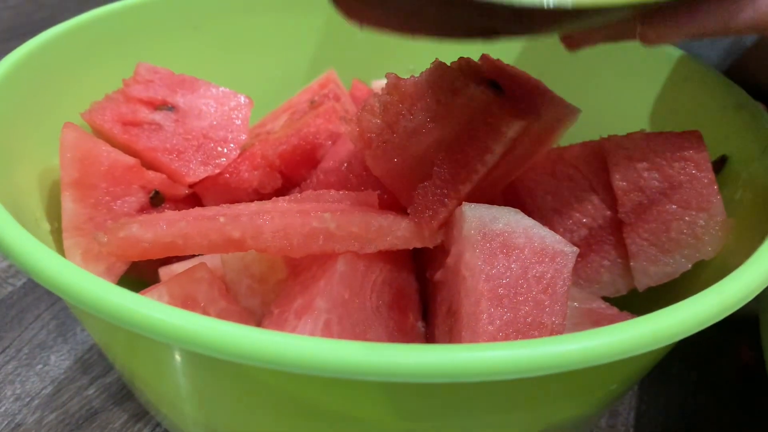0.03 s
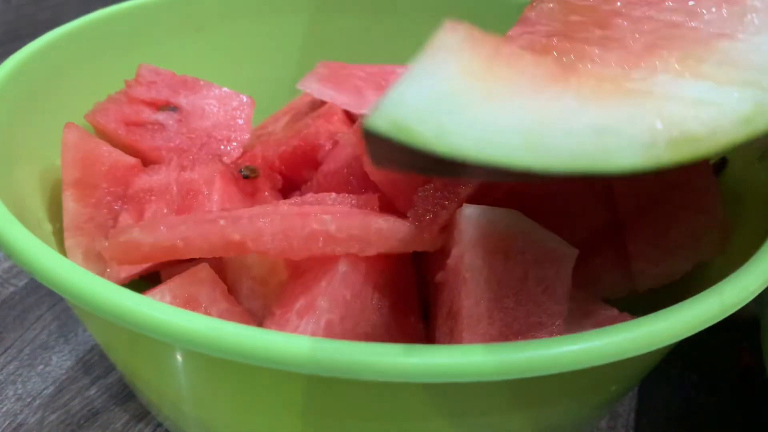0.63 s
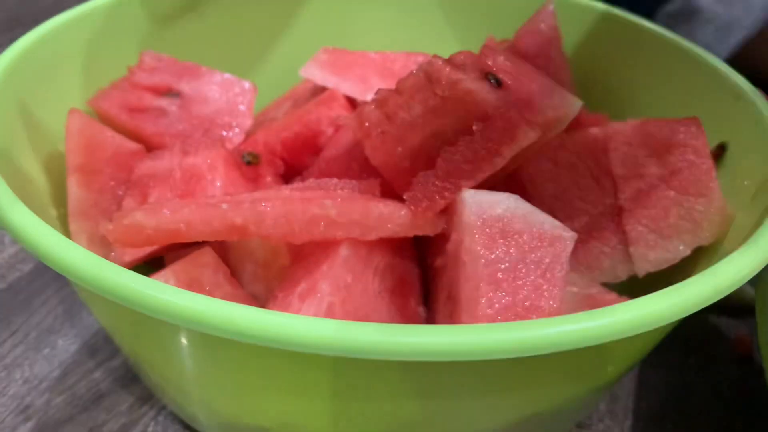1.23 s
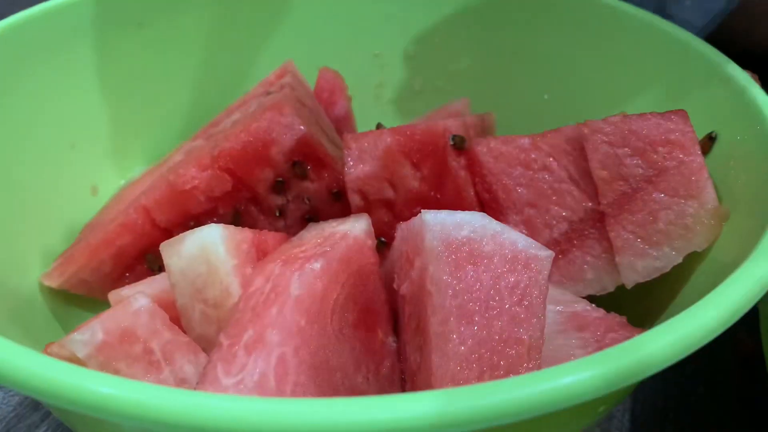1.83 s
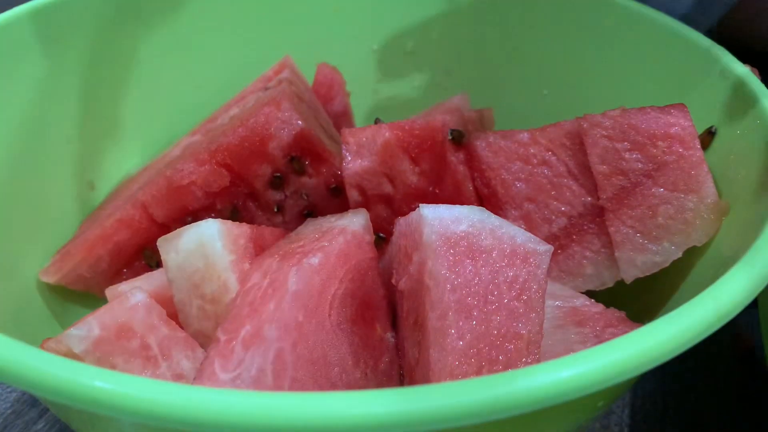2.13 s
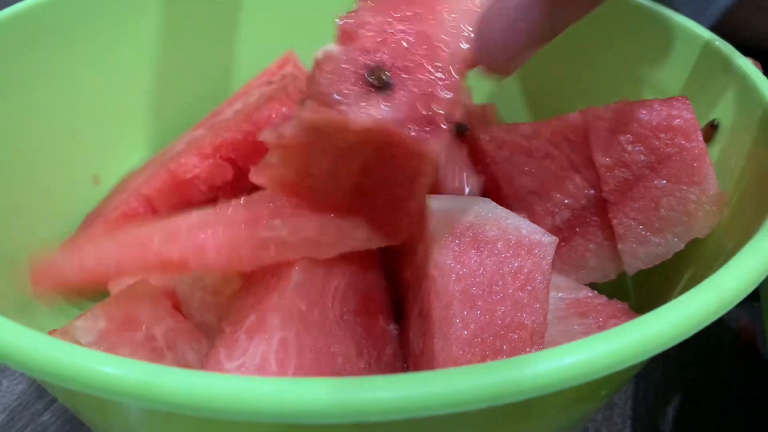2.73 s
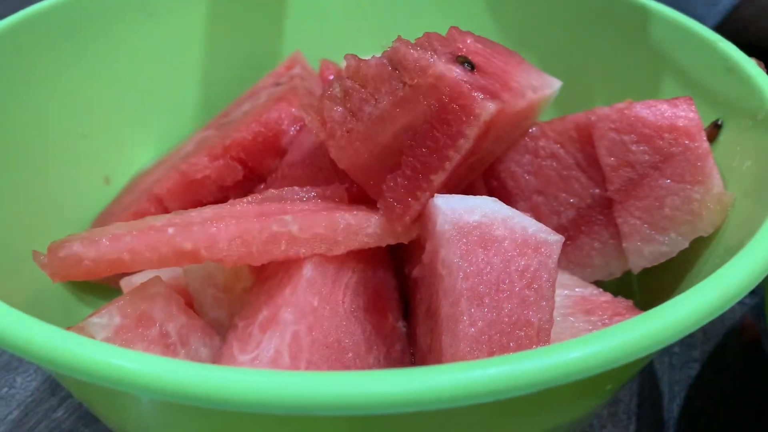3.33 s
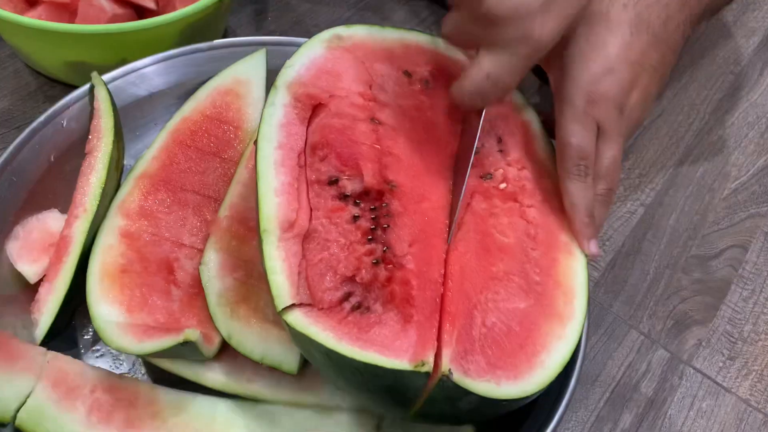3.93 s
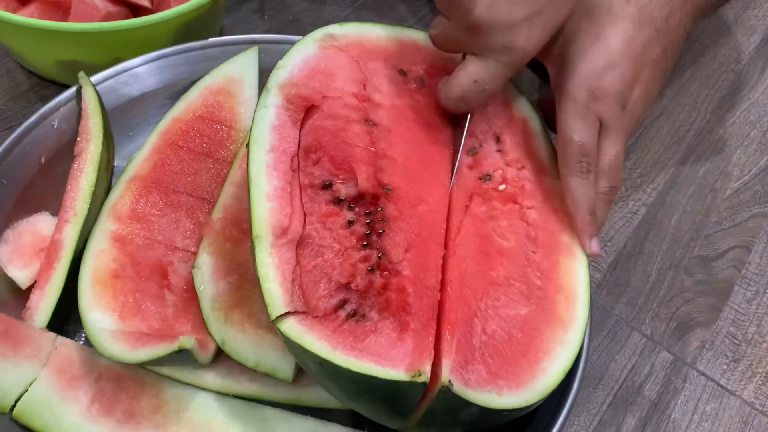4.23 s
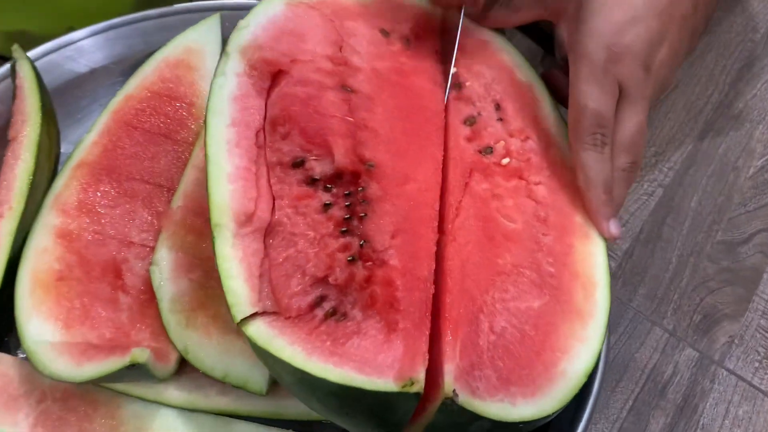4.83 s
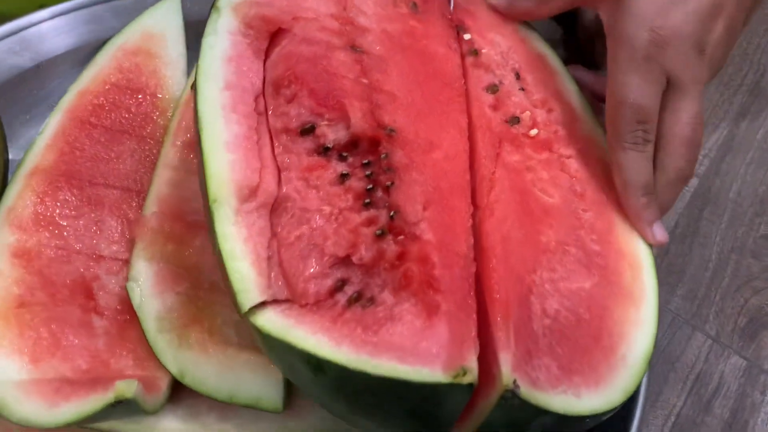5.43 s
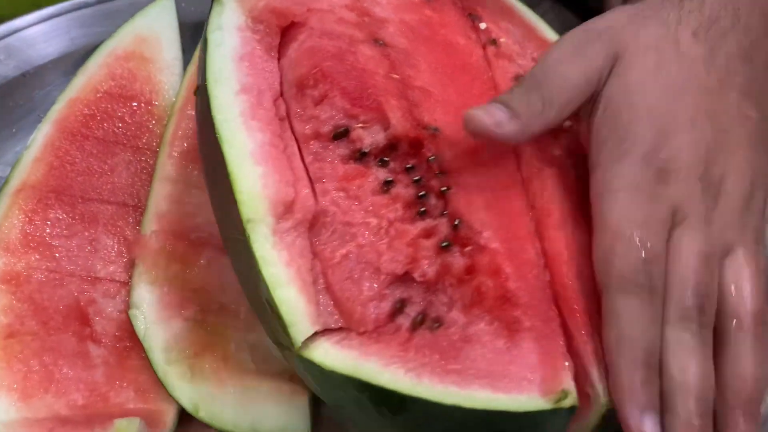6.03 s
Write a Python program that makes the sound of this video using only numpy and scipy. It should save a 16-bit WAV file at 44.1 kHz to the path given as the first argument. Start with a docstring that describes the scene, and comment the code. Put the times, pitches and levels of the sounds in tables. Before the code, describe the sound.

A fan whirs steadily in a room, blowing low puffs of air onto a close stereo microphone. Faint wet slicing, ticks of juice and light knocks come from watermelon pieces dropping into a plastic bowl, which takes a dull bump. After a brief dip in level, the rind of a half melon gives way under a knife with two loud, crisp cracks, followed by juicy fizzing and small wet ticks.

```python
"""Cutting watermelon under a ceiling fan

Indoors, stereo microphone close to the knife. Wet chunks are sliced off, their cells bursting, and
laid in a plastic bowl. Then the rind of a half melon on a steel tray tears and splits with two loud
cracks and a juicy fizz. Overhead the fan hums and throbs, and its draught buffets the microphone.
The sound runs in three stretches, with a brief dip in level between them."""
import sys
import numpy as np
from scipy import signal
from scipy.fft import rfft, irfft
from scipy.io import wavfile
from scipy.ndimage import uniform_filter1d

SR = 44100
rng = np.random.default_rng(int(sys.argv[2]) if len(sys.argv) > 2 else 0)


def persist_wave(psi):
    """Save psi, clipped to +-1, as 16-bit WAV."""
    counts = np.round(np.clip(psi, -1, 1) * 32767).astype(np.int16)
    wavfile.write(sys.argv[1], SR, np.atleast_2d(counts).T)


N = 273420
TIME = np.arange(N) / SR
SLICE_LAG, KNOCK_LAG = 8, 3  # samples by which the left channel hears the sound later

# the rind gives way: t/s, tearing level/dB, build-up/(s per 60 dB), melon/dB, tray/dB, room/dB
RIND_SPLITS = [(4.2118, -24, 0.0448, -5.5, 1, 6.5), (4.636, -35, 0.14, -1, -8, -2.5)]
# snaps within the cracks: t/s, body level/dB, f/Hz, t60/s, crunch/dB, crunch t60/s, left lead/samples
RIND_SNAPS = [(4.2114, -5.5, 1370, 0.0097, -14, 0.0095, 3.5), (4.2138, -17.5, 697, 0.018, -15.5, 0.011, 11),
              (4.2157, -7, 1980, 0.011, -16, 0.0063, 4), (4.2172, -15, 1300, 0.009, -12, 0.011, 9),
              (4.636, -10, 1212, .016, -16.5, 0.0088, 1), (4.6402, -16.5, 830, 0.022, -28, 0.013, 6)]
# modes of the hollow half melon: f/Hz, level/dB, t60/s
MELON_MODES = [(549, -29.5, 0.17), (693, -30, 0.1), (815, -31, 0.1), (1340, -35, 0.12)]
# modes of the steel tray under it: f/Hz, level/dB, t60/s
TRAY_MODES = [(1410, -57, 0.66), (1674, -53, 0.41), (2110, -41, .55), (2195, -39, 0.39), (4350, -52, .3),
              (4925, -53, .3)]
# spectrum of a crack as it reaches the walls: f/Hz, relative level/dB
ECHO_SPECTRUM = [(250, -25), (500, -4), (830, 3.5), (1100, 0.5), (2200, 2), (3000, -7), (4600, -6),
                 (7500, -16.5), (11000, -14.5), (16000, -22)]
def cracks(sharp_by=0.37, settle_s=0.0012, near_db=-7, near_t60=0.036, lowest_hz=460):
    """Close up, the stiff rind snaps; the melon knocks, the tray rings faintly and the room answers."""
    direct, ring, to_walls = np.zeros((2, N)), np.zeros(N), np.zeros(N)
    t = TIME[:SR]
    sag = 1 + sharp_by * np.exp(-t / settle_s)  # pitch falls as the rind slackens
    no_bass = signal.butter(3, lowest_hz, "high", fs=SR, output="sos")
    for s, db, hz, t60, crunch_db, crunch_t60, lead in RIND_SNAPS:
        body = gain_of(db - 60 * t / t60) * np.sin(2 * np.pi * np.cumsum(hz * sag) / SR)
        snap = signal.sosfilt(no_bass, body + crunch(crunch_db, crunch_t60, t))
        add(direct[0], s - lead / SR, snap)
        add(direct[1], s, snap)
    for s, _, _, melon_db, tray_db, room_db in RIND_SPLITS:
        add(ring, s, gain_of(melon_db) * damped(MELON_MODES, t))
        add(ring, s, gain_of(tray_db) * damped(TRAY_MODES, t))
        add(to_walls, s, coloured(gain_of(room_db) * (t == 0), ECHO_SPECTRUM))
    near = scatter(direct[1] + ring, [(1000, near_t60)], gap_s=.0003)
    return direct + ring + gain_of(near_db) * near + walls(to_walls)


# spectrum of the crunch as heard, with notches in the treble: f/Hz, relative level/dB
CRUNCH_SPECTRUM = [(150, -35), (450, -7), (800, -1.5), (1400, 5.5), (2200, 7.5), (3300, 3), (4500, 1.5),
                   (5800, 0), (7800, -8), (10200, -0.5), (13200, -11), (15500, -5)]
def tears(fibres_per_s=3000, room_db=-8):
    """Fibres give way, louder and louder until the rind splits."""
    out, t = np.zeros(N), TIME[:SR // 5]
    for s, db, build_s, *_ in RIND_SPLITS:
        snaps = evened(rng.standard_normal(len(t)) * (rng.random(len(t)) < fibres_per_s / SR))
        add(out, s - t[-1], snaps * gain_of(db - 60 * t[::-1] / build_s))
    out = coloured(out, CRUNCH_SPECTRUM)
    return in_room(out, gain_of(room_db) * out, KNOCK_LAG, near_db=2.0, near_t60=0.037)


def crunch(db, t60, t, click_db=9):
    """A sharp click, then a dying burst of snapping fibres."""
    fibres = gain_of(-60 * t / t60) * rng.standard_normal(len(t))
    fibres[0] = gain_of(click_db)
    return gain_of(db) * coloured(fibres, CRUNCH_SPECTRUM)[:len(t)]


# strokes that part or rub the flesh: t/s, rise/s, hold/s, level/dB
FLESH_STROKES = [(0.003, 0.0029, 0.023, -54.5), (0.104, 0.076, 0.015, -46), (0.206, 0.016, 0.15, -52.5),
                 (0.391, 0.044, 0.074, -49), (0.74, 0.038, .02, -62), (1.28, .06, .06, -71),
                 (1.799, 0.021, 0.016, -42), (2.518, 0.025, 0.04, -56), (2.617, 0.028, .1, -59),
                 (2.867, 0.033, .01, -57), (3.783, .006, 0.058, -51), (3.895, .07, 0.06, -55),
                 (4.14, 0.063, 0.011, -39), (4.37, .02, 0.0056, -52), (4.429, 0.021, 0.035, -50.5),
                 (4.555, 0.082, 0.024, -45), (4.793, 0.03, .02, -53), (4.89, 0.16, 0.1, -47.5),
                 (5.28, 0.077, 0.097, -49), (5.698, .12, 0.13, -64.5)]
# spectrum of the bright, wet fizz as heard, with two treble notches: f/Hz, relative level/dB
FIZZ_SPECTRUM = [(300, -46), (1500, 2), (4300, -4.5), (6000, -8), (8400, -13), (9600, -4), (11200, 1.5),
                 (13200, -4), (14700, 7.5), (16000, -6.5)]
def flesh(cells_per_s=1800, pops_per_s=70, clump_db=3, release_db_per_s=285, room_db=-15):
    """Juicy cells burst in clumps as the flesh is cut and pressed; a few pop much louder."""
    pressure, t = np.zeros(N), TIME[:SR // 2]
    for start, rise, hold, db in FLESH_STROKES:
        release_db = release_db_per_s * np.maximum(t - rise - hold, 0)
        add(pressure, start, np.minimum(t / rise, 1) * gain_of(db - release_db))
    cells = rng.choice([-1, 1], N) * (rng.random(N) < cells_per_s / SR)
    bursts = evened(cells * gain_of(clump_db * wander(54)))
    pops = rng.uniform(-21, 21, N) * (rng.random(N) < pops_per_s / SR)
    juice = coloured((bursts + pops) * pressure, FIZZ_SPECTRUM)
    return in_room(juice, gain_of(room_db) * juice, SLICE_LAG, near_db=-3.5, near_t60=0.06)


# knocks of fruit and blade: t/s, body level/dB, f/Hz, crunch/dB, crunch t60/s, room/dB
FRUIT_KNOCKS = [ (0.332, -41, 1850, -43, 0.035, -4), (1.814, -24.5, 362, -58, .06, -22),
                (2.9192, -18, 2840, -28, 0.004, -12), (2.9255, -25, 2870, -26, 0.005, -13),
                (4.385, -28, 1440, -33.5, 0.045, 0)]
# modes of a knock: multiple of its pitch, relative level/dB
FRUIT_MODES = [(1, -1), (1.19, -8), (1.9, -15)]
def knocks(t60_cycles=23):
    """Each blow is a damped knock of the fruit with a crunch of fibres."""
    direct, to_walls = np.zeros((2, N))
    t = TIME[:SR // 8]
    for s, db, hz, crunch_db, crunch_t60, room_db in FRUIT_KNOCKS:
        modes = [(ratio * hz, db + mode_db, t60_cycles / hz) for ratio, mode_db in FRUIT_MODES]
        blow = damped(modes, t) + crunch(crunch_db, crunch_t60, t)
        add(direct, s, blow)
        add(to_walls, s, gain_of(room_db) * blow)
    return in_room(direct, to_walls, KNOCK_LAG, near_db=-1.0, near_t60=0.029)


# small wet ticks near the microphone: t/s, level/dB
JUICE_TICKS = [(0.2433, -49), (0.787, -44), (0.8929, -44), (1.848, -31), (2.5023, -49), (2.547, -41),
               (2.556, -43), (2.5795, -44), (2.6262, -38), (2.662, -43), (2.701, -43), (2.792, -38),
               (2.874, -51), (2.9192, -37), (2.9255, -37), (3.7243, -34), (3.785, -31), (3.789, -41),
               (3.9361, -36), (4.014, -34.5), (4.152, -30), (4.397, -35), (4.9818, -36), (5.0652, -45),
               (5.1502, -37), (5.252, -46), (5.2945, -43.5), (5.3942, -37), (5.4547, -38), (6.092, -48),
               (6.1025, -44), (6.111, -28)]
def ticks(t60=0.0097, room_db=-13):
    """Films of juice snap as wet faces meet and part."""
    out, t = np.zeros(N), TIME[:SR // 10]
    for s, db in JUICE_TICKS:
        add(out, s, gain_of(db - 60 * t / t60) * rng.standard_normal(len(t)))
    out = coloured(out, FIZZ_SPECTRUM)
    return in_room(out, gain_of(room_db) * out, SLICE_LAG, near_db=-3.5, near_t60=0.04)


# wet faces slide over each other: t/s, length/s, level/dB, resonance f/Hz
WET_SLIDES = [(0.31, 0.045, -47.5, 1900), (3.945, 0.049, -47.5, 2290), (4.376, 0.022, -41, 1520)]
def squelches(slips_per_s=900, width_hz=480, glide=.08, room_db=-2):
    """Uneven slips ring a pocket of air and juice, whose pitch rises as it is pressed narrower."""
    out = np.zeros(N)
    pole = np.exp(-np.pi * width_hz / SR)
    for s, length, db, hz in WET_SLIDES:
        progress = np.arange(0, 1, 1 / (length * SR))
        slips = rng.standard_normal(len(progress)) * (rng.random(len(progress)) < slips_per_s / SR)
        pitch = hz * (1 + glide * (progress - .5))
        phasor = np.exp(2j * np.pi * np.cumsum(pitch) / SR)
        ring = (phasor * signal.lfilter([1], [1, -pole], slips / phasor)).real  # gliding resonator
        add(out, s, gain_of(db) * evened(ring * np.sin(np.pi * progress ** 0.68)))
    return in_room(out, gain_of(room_db) * out, KNOCK_LAG, near_db=1.0, near_t60=0.082)


# one bump against the plastic bowl: t/s, level/dB
BOWL_BUMP = (3.7215, -18)
# modes of the bowl: f/Hz, relative level/dB, t60/s
BOWL_MODES = [(292, -3.5, 0.033), (542, -4, 0.032), (1390, -2, 0.012), (2266, -12, 0.023)]
def bowl(crunch_db=-37, crunch_t60=0.029, room_db=-7):
    """The full bowl takes a dull bump and the chunks shift in it."""
    out, t = np.zeros(N), TIME[:SR // 5]
    s, db = BOWL_BUMP
    add(out, s, gain_of(db) * damped(BOWL_MODES, t) + crunch(crunch_db, crunch_t60, t))
    return in_room(out, gain_of(room_db) * out, KNOCK_LAG, near_db=3.5, near_t60=0.055)


# two stretches at the bowl, then one at the tray: start t/s, end t/s, air level/dB, hum gain/dB
STRETCHES = [(-0.1, 1.612, -35, -2), (1.642, 3.879, -35, 1.5), (3.883, 6.3, -38, -11)]
# the fan's air with the microphone at the bowl: f/Hz, relative level/dB
BOWL_AIR = [(76, -20.5), (130, -8.5), (187, -2), (308, -7.5), (372, -3), (434, -8.5), (525, -8.5),
            (646, -16.5), (928, -14), (1030, -18), (1120, -11.5), (1610, -23.5), (2200, -23.5),
            (2900, -31.5), (3500, -35), (8000, -52.5), (10400, -101), (17600, -120)]
# the same air with the microphone at the tray: f/Hz, relative level/dB
TRAY_AIR = [(76, -38), (130, -6), (268, -5), (313, -1), (341, -3), (420, -0.5), (490, -2.5), (534, 0),
            (729, -8), (794, -9.5), (1180, -8), (1380, -9.5), (1610, -14), (1980, -15.5), (8000, -42.5),
            (10400, -118), (17600, -120)]
# tones of the fan's motor: f/Hz, level/dB
MOTOR_TONES = [(364.2, -50), (906, -58.5), (533, -58.5)]
def fan(blade_hz=16.15, throb_depths=(.1, .37, .08), swish_hz=(170, 620)):
    """Overhead, air rushes and the motor hums; each blade passes with a bright edge, then a low swell."""
    blade = 2 * np.pi * blade_hz * (TIME - 3)
    band = signal.butter(2, swish_hz, "band", fs=SR, output="sos")
    hum, out = np.zeros(N), np.zeros((2, N))
    for hz, db in MOTOR_TONES:
        wavering = np.sin(2 * np.pi * hz * TIME + 0.38 * wander(10.6))
        hum += gain_of(db) * evened(wavering * (1 + 0.57 * wander(9.7)))
    spectra = [BOWL_AIR, BOWL_AIR, TRAY_AIR]
    for (start, end, air_db, hum_db), depth, spectrum in zip(STRETCHES, throb_depths, spectra):
        air = gain_of(air_db) * diffuse(spectrum) + gain_of(hum_db) * hum
        swish = signal.sosfiltfilt(band, air)
        throb = swish * np.cos(blade) - .3 * (air - swish) * np.sin(blade)
        out += (air + depth * throb) * during(start, end)
    return out


# rumble of wind right on the microphone: f/Hz, relative level/dB
WIND_SPECTRUM = [(15, -24), (30, -27), (45, -3), (58, -0.5), (85, -4), (120, -12), (200, -20.5), (400, -39),
                 (900, -92)]
# steady part of the draught: t/s, relative level/dB
BREEZE_LEVELS = [(0.0, -47), (2.21, -45.5), (2.61, -52.5), (3.63, -44.5), (4.83, -51), (4.99, -46),
                 (5.75, -43.5), (5.87, -53), (6.06, -50), (6.2, -38)]
# stronger puffs: peak t/s, level/dB, length/s
WIND_PUFFS = [(0.353, -39, 0.11), (0.766, -33, 0.044), (0.942, -38.5, 0.087), (1.32, -33.5, 0.026),
              (1.5, -35, 0.11), (1.66, -25, 0.041), (2.07, -33, 0.098), (2.257, -33.5, 0.07),
              (3.401, -31, 0.095), (3.633, -38, .06), (3.778, -31, 0.048), (4.02, -39.5, 0.076),
              (4.835, -36, 0.067), (5.011, -27, 0.04), (5.26, -35, 0.076), (5.634, -27.5, 0.092),
              (5.843, -30.5, 0.053), (6.135, -27, 0.076)]
def draught(breeze_db=3, lumps_db=2.0, lumps_hz=9):
    """Eddies from the fan push on the microphone: a lumpy breeze, and puffs that swell and fade."""
    eddies = diffuse(WIND_SPECTRUM)
    eddies /= np.sqrt(uniform_filter1d((eddies ** 2).mean(0), size=3000))  # hold the rms near one
    steady_db = breeze_db + np.interp(TIME, *np.transpose(BREEZE_LEVELS))
    breeze = gain_of(steady_db + lumps_db * wander(lumps_hz))
    puffs = sum(gain_of(db) * np.exp(-2 * ((TIME - s) / length) ** 2) for s, db, length in WIND_PUFFS)
    return eddies * np.hypot(breeze, puffs)


# background hiss as heard: f/Hz, relative level/dB
HISS_SPECTRUM = [(100, 14.5), (7000, -9), (8700, -26), (10200, 4), (12000, 0), (13200, -13), (14300, 13),
                 (15500, -29)]
def hiss(level_db=-69):
    """Faint, steady hiss with gaps in the treble near 8.7 and 13 kHz."""
    return gain_of(level_db) * diffuse(HISS_SPECTRUM)


# reverberation of the room: f/Hz, t60/s
ROOM_DECAY = [(200, 0.13), (600, 0.38), (1400, 0.4), (3500, 0.44), (9000, 0.28), (16000, 0.34)]
def walls(x):
    """The walls, farther off, answer after a short gap."""
    return scatter(x, ROOM_DECAY, gap_s=.006)


def in_room(x, to_walls, lag, near_db, near_t60):
    """Direct sound reaches the right channel first; close surfaces and then the walls answer."""
    near = scatter(x, [(1000, near_t60)], gap_s=.0003)
    return np.array([np.roll(x, lag), x]) + gain_of(near_db) * near + walls(to_walls)


def scatter(x, t60_by_hz, gap_s):
    """Dense echoes of unit energy, different in each channel, each band dying at its own speed."""
    hz, age, bands = signal.stft(rng.standard_normal((2, SR // 2)), SR, nperseg=64)
    decay = gain_of(-60 * age / read(t60_by_hz, hz)[:, None])
    tail = signal.istft(bands * decay, SR, nperseg=64)[1]
    tail /= np.linalg.norm(tail, axis=1, keepdims=True)
    tail = np.pad(tail, ((0, 0), (round(gap_s * SR), 0)))
    return signal.fftconvolve(x[None], tail, axes=1)[:, :N]


# likeness of the microphone's two channels: f/Hz, coherence (0-1)
COHERENCE = [(50, 0.7), (200, 0.87), (400, 0.58), (800, 0.28), (1500, 0.1), (3000, 0.01), (16000, 0)]
def diffuse(spectrum):
    """Stereo noise from all around: alike in the bass, unrelated in the treble."""
    hz = np.fft.rfftfreq(N, 1 / SR)
    a, b = rfft(rng.standard_normal((2, N)))
    same = read(COHERENCE, hz)
    mid, side = a * np.sqrt(1 + same), b * np.sqrt(1 - same)
    return evened(irfft(np.array([mid + side, mid - side]) * gain_of(read(spectrum, hz)), N))


def damped(modes, t):
    """Ringing of a table of modes."""
    return sum(gain_of(db - 60 * t / t60) * np.sin(2 * np.pi * hz * t) for hz, db, t60 in modes)


def coloured(x, spectrum):
    """Minimum-phase filter of unit energy with the given spectrum."""
    hz = abs(np.fft.fftfreq(2048, 1 / SR))
    log_gain = np.log(gain_of(read(spectrum, hz)))
    taps = np.fft.ifft(np.exp(np.conj(signal.hilbert(log_gain)))).real
    return signal.oaconvolve(x, taps / np.linalg.norm(taps))[:N]


def wander(rate_hz):
    """Slow random drift of unit rms."""
    hz = np.fft.rfftfreq(N, 1 / SR)
    return evened(irfft(rfft(rng.standard_normal(N)) * np.exp(-(hz / rate_hz) ** 2), N))


def during(start, end, fade_s=0.0029):
    """One inside a stretch, zero outside."""
    return np.clip((TIME - start) / fade_s, 0, 1) * np.clip((end - TIME) / fade_s, 0, 1)


def gain_of(db):
    """Decibels to a factor."""
    return 10 ** (np.asarray(db) / 20)


def evened(x):
    """Scales to an rms of one."""
    return x / np.sqrt(np.mean(x ** 2) + 1e-20)


def read(points, hz):
    """Reads a table on a log-frequency axis."""
    f, value = np.transpose(points)
    return np.interp(np.log(hz + 1), np.log(f + 1), value)


def add(mix, s, sound):
    """Adds a sound to a track at s seconds."""
    part = mix[round(s * SR):][:len(sound)]
    part += sound[:len(part)]


def scene():
    """The melon close to the microphone, with fan, draught and hiss around it."""
    melon = cracks() + tears() + flesh() + knocks() + ticks() + squelches() + bowl()
    return melon + fan() + draught() + hiss()


def record(dry, dip_db=-28, top_hz=16000):
    """The level dips briefly between stretches, and the highest treble is cut off."""
    running = sum(during(start, end) for start, end, *_ in STRETCHES)
    dipped = dry * np.maximum(running, gain_of(dip_db))
    lowpass = signal.firwin(511, top_hz, window=("kaiser", 9), fs=SR)
    return signal.oaconvolve(dipped, lowpass[None], "same")


dry = scene()
out = record(dry)
persist_wave(out)
```